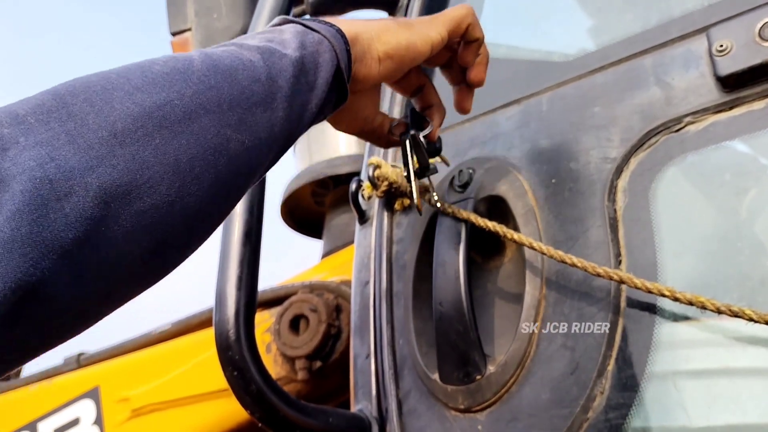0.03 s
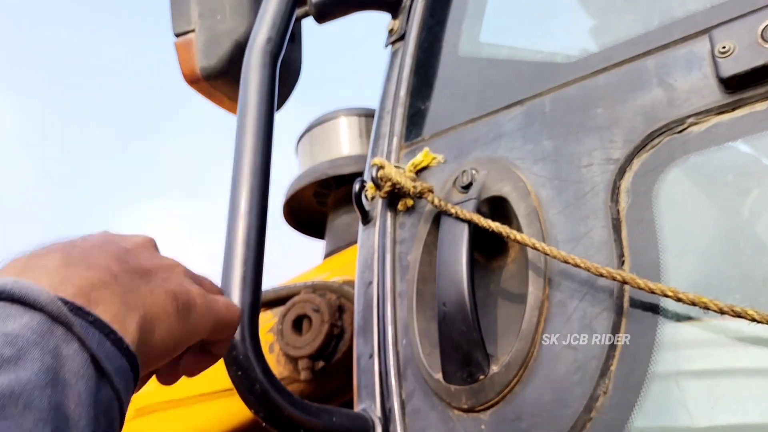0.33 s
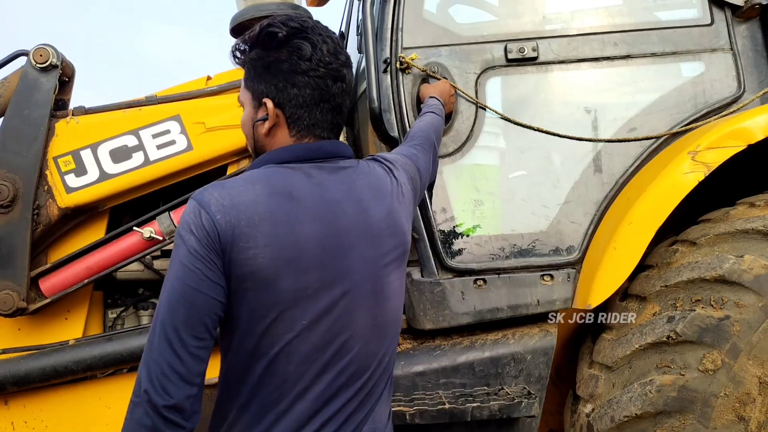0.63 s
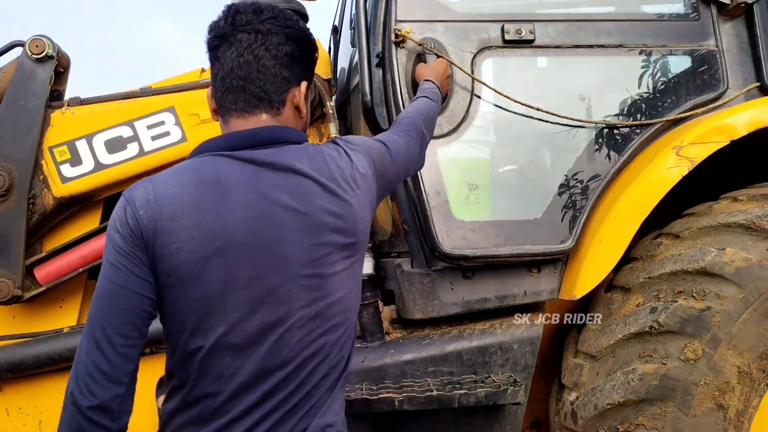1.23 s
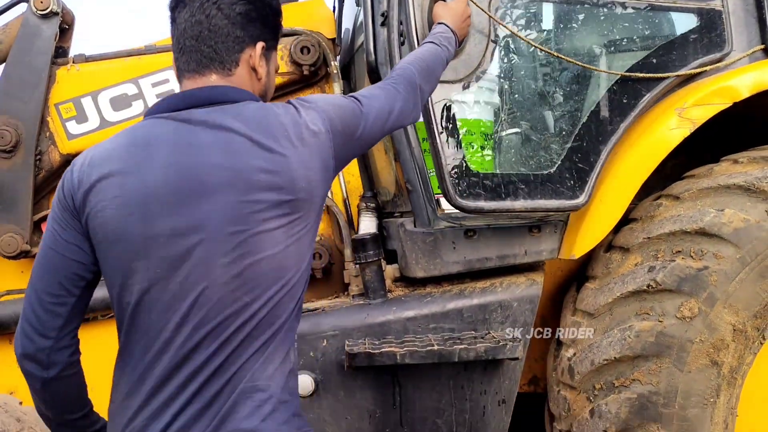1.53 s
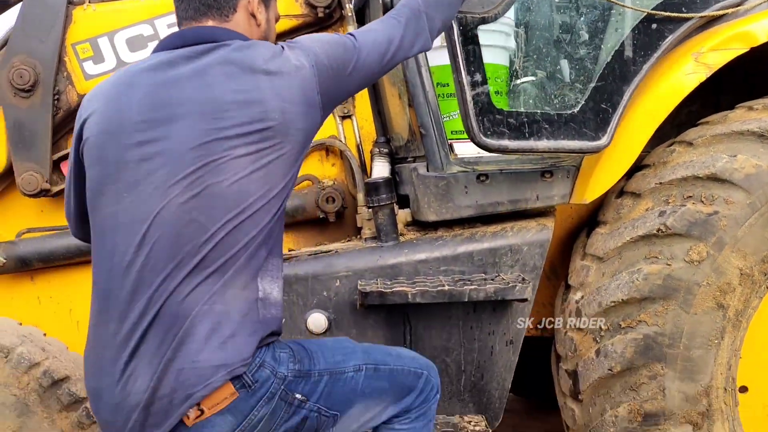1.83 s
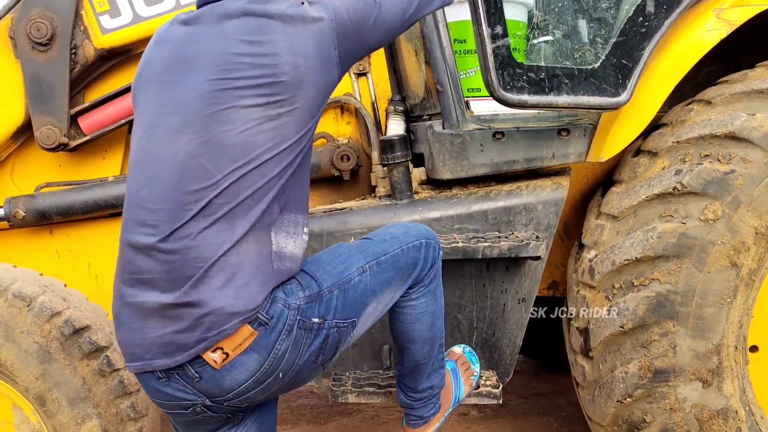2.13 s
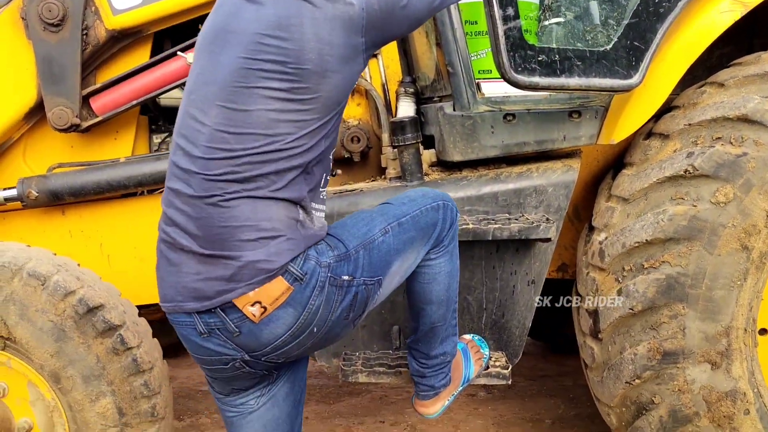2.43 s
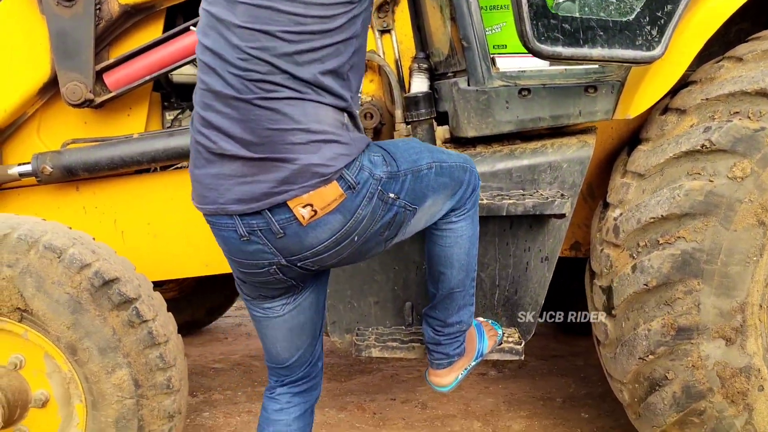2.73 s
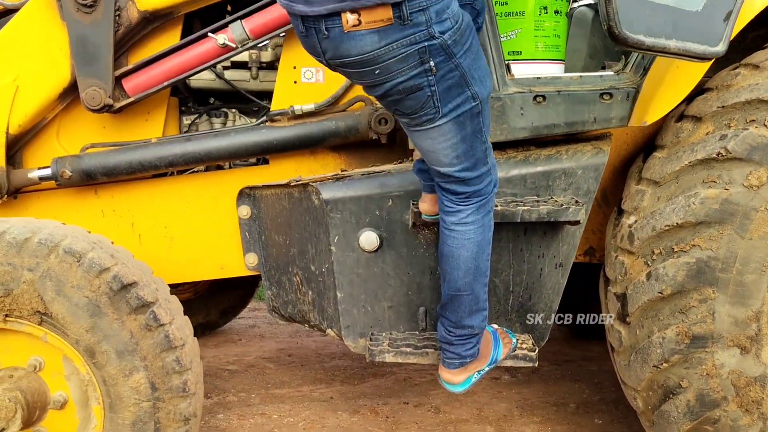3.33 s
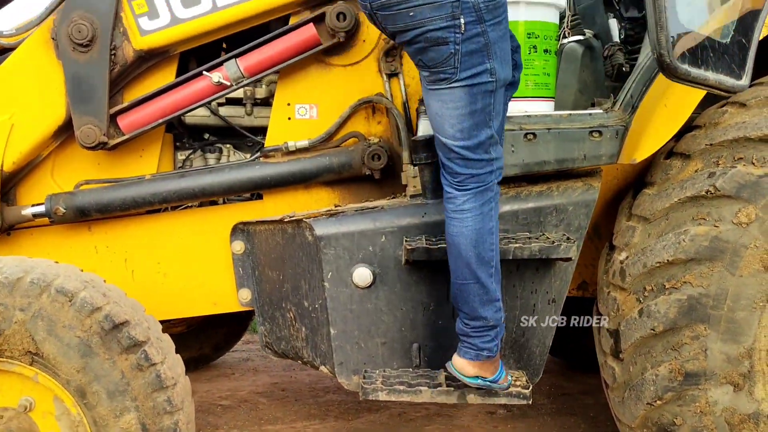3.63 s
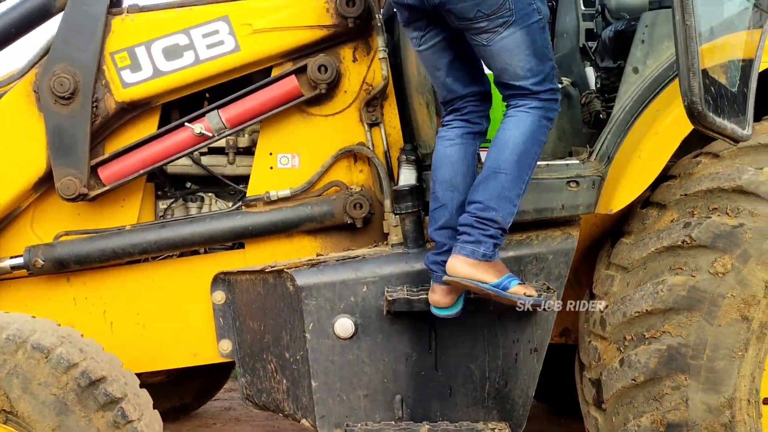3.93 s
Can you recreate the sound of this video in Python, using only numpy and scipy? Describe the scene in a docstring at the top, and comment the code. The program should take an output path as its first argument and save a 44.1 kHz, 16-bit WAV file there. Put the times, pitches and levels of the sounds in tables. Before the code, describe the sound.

A digger's cab door creaks open, close and slightly left. Keys scrape and clink lightly in the first second, and the latch clunks at about 1.1 seconds. From 1.3 the hinge gives a falling creak that slows to ticks by 2.2. A second creak rises from 2.7 into a held tone until the door knocks at 3.9. Small birds chirp faintly in the outdoor air, with soft low bumps nearby.

```python
"""Opening a digger's cab door

Close to a parked digger, its door a little left of the microphones. Keys scrape and jingle, the latch
clunks and the door swings on a dry hinge that sticks and slips: a falling creak that slows to ticks,
then a second that locks into a clean tone until the door knocks. Small birds chirp, one near and a
flock farther off, over faint outdoor air; soft low bumps come from close by."""
import sys
import numpy as np
from scipy import signal
from scipy.fft import rfft, irfft, next_fast_len
from scipy.io import wavfile
from scipy.ndimage import uniform_filter1d

SR = 44100
rng = np.random.default_rng(int(sys.argv[2]) if len(sys.argv) > 2 else 0)


def materialize(psi):
    """Save the field psi as 16-bit PCM at rate SR to the path in sys.argv[1].

    A 1-D psi becomes a single channel; in a 2-D psi each row is a channel.
    """
    bounded = np.clip(np.atleast_2d(psi).T, -1, 1)
    quanta = np.round(bounded * 32767).astype(np.int16)
    wavfile.write(sys.argv[1], SR, quanta)


N = 176400


def amp(db):
    return 10 ** (np.asarray(db) / 20)


def unit_rms(x):
    return x / np.sqrt(np.mean(x ** 2) + 1e-20)


def along(points, hz):
    """Read a curve of (freq_hz, value) points on a log frequency axis."""
    freqs, values = np.transpose(points)
    return np.interp(np.log(hz + 1), np.log(freqs + 1), values)


def add(track, start_s, x):
    """Mix x into the track at start_s."""
    i = max(round(start_s * SR), 0)
    n = min(x.shape[-1], track.shape[-1] - i)
    track[..., i:i + n] += x[..., :n]


def filtered(x, response):
    """Filter x by a complex function of frequency."""
    n = x.shape[-1]
    padded = 2 * next_fast_len(n // 2 + 4096)
    return irfft(rfft(x, padded) * response(np.fft.rfftfreq(padded, 1 / SR)), padded)[..., :n]


def causal_log(log_gain):
    """Complex log spectrum of the minimum-phase filter with this log gain."""
    cepstrum = irfft(log_gain)
    half = cepstrum.shape[-1] // 2
    cepstrum[..., 1:half] *= 2
    cepstrum[..., half + 1:] = 0
    return rfft(cepstrum)


def coloured(x, points):
    """Causal filter of unit power through (freq_hz, gain_db) points."""
    return filtered(x, lambda hz: np.exp(causal_log(np.log(unit_rms(amp(along(points, hz)))))))


def stereo_noise(size):
    """White noise at the two microphones, most alike in the low mids."""
    # likeness of left and right: freq_hz, correlation
    likeness = [(60, 0.083), (200, 1), (1000, 0.7), (5000, 0.083)]

    def mid_side_gains(hz):
        angle = np.arccos(np.clip(along(likeness, hz), -1, 1)) / 2
        return np.array([np.cos(angle), np.sin(angle)])
    mid, side = filtered(rng.standard_normal((2, size)), mid_side_gains)
    return np.array([mid + side, mid - side])


def swells(rows, colour, grain_db):
    """Short swells of coloured noise with a grainy level."""
    level = np.zeros(N)
    for start_s, level_db, length_s in rows:
        add(level, start_s, amp(level_db) * np.sqrt(np.hanning(int(length_s * SR))))
    grain = amp(grain_db * unit_rms(uniform_filter1d(rng.standard_normal(N), size=90)))
    return level * unit_rms(coloured(stereo_noise(N) * grain, colour))


def outdoor_air(level_db=-58):
    """A faint, steady rumble and hiss all around."""
    # outdoor noise floor: freq_hz, gain_db
    colour = [(25, -21.5), (100, 2.5), (800, -22), (2200, -15.5), (4300, -22), (7400, -6.5), (10600, -33)]
    return amp(level_db) * unit_rms(coloured(stereo_noise(N), colour))


def scrapes():
    """Close by, the key scrapes in the lock and a sleeve rustles."""
    # rubbing strokes: start_s, level_db, length_s
    strokes = [(0, -46.5, .1), (.78, -52.5, .14), (1.05, -45, 0.26), (2.28, -59, 0.18)]
    # friction spectrum: freq_hz, gain_db
    colour = [(150, 17.5), (1700, 8), (3200, 7.5), (9000, -2), (14000, -24)]
    return swells(strokes, colour, grain_db=4.5)


def knocks():
    """Latch and door blows and single hinge ticks: short rattling contacts that ring the door."""
    # blows on the door: start_s, level_db, lowpass_hz, fade_s (time to fall 20 dB)
    blows = [(0.065, -33, 2160, 0.013), (1.124, -34, 880, 0.12), (1.138, -33, 8700, 0.0043),
             (1.1408, -11, 4170, 0.0064), (1.149, -32.5, 3800, 0.17), (1.238, -32, 750, 0.09),
             (1.572, -29, 1060, 0.037), (2.139, -23, 5297, 0.0059), (2.272, -26, 5050, 0.0031),
             (2.708, -27.5, 3950, 0.0082), (3.494, -29, 990, 0.087), (3.902, -15, 7800, 0.0084),
             (3.907, -12, 1680, 0.0066)]
    # contact spectrum: freq_hz, gain_db
    colour = [(50, -54), (220, -7), (1400, 2), (3900, 0), (5000, -4), (15000, -9)]
    drive, t = np.zeros(N), np.arange(SR // 4) / SR
    for start_s, level_db, lowpass_hz, fade_s in blows:
        burst = coloured(rng.standard_normal(len(t)), colour)
        burst = unit_rms(signal.lfilter(*signal.butter(2, lowpass_hz, fs=SR), burst))
        add(drive, start_s, burst * amp(level_db - 20 * t / fade_s))
    return panel(door(drive, direct_db=-4.5, flatten=0.29))


def door(drive, direct_db, flatten):
    """The door answers with a sharp front and a dense short ring; flatten (0-1) evens its spectrum."""
    # decay of the door's ring: freq_hz, t60_s
    decay = [(500, 0.14), (10000, 0.17)]
    n = SR // 4
    hz, frame_s, spectra = signal.stft(stereo_noise(n), SR, nperseg=256)
    fade = amp(-60 * frame_s / along(decay, hz)[:, None])
    ring = signal.istft(spectra * fade, SR, nperseg=256)[1][:, :n]
    ring /= np.linalg.norm(ring[0])
    ring[:, 0] += amp(direct_db)
    spectrum = rfft(ring, SR)
    power = np.mean(np.abs(spectrum) ** 2, axis=0)
    ring = irfft(spectrum * np.exp(-flatten * causal_log(np.log(power + 1e-9) / 2)))[:, :n]
    return signal.fftconvolve(drive[None], ring / np.linalg.norm(ring[0]), axes=1)[:, :N]


def panel(x, mode_db=2, bass_t60_s=0.14, knee_hz=2520):
    """The steel and glass panel adds its own modes, narrow in the bass and broad in the treble."""
    # panel resonances: freq_hz
    mode_hz = [156, 245, 600, 1040, 1290, 1470, 2350, 3500, 4000]
    t, hz = np.arange(SR // 4) / SR, np.array(mode_hz)[:, None]
    t60_s = bass_t60_s / (1 + hz / knee_hz)
    unity_peak = 2 * np.log(1000) / (t60_s * SR)
    modes = unity_peak * np.cos(2 * np.pi * hz * t) * amp(mode_db - 60 * t / t60_s)
    return x + signal.fftconvolve(x, modes.sum(axis=0)[None], axes=1)[:, :N]


def keys(squeak_s=0.052, squeak_db=-49, crack_t60_s=0.055):
    """Keys squeak in the lock, then tick and clink: a dry crack and one short mode for each strike."""
    # keys striking each other or the lock: start_s, level_db, ring_hz, t60_s
    clinks = [(.409, -49, 2350, .025), (.433, -50, 2400, .025), (.667, -38, 8005, .085),
              (.701, -45, 5600, .02), (.731, -41.5, 9520, .06)]
    # squeaks in the lock: start_s, from_hz, to_hz
    squeaks = [(0.186, 1800, 2165), (0.234, 1750, 1703)]
    out, t = np.zeros((2, N)), np.arange(SR // 4) / SR
    for start_s, level_db, ring_hz, t60_s in clinks:
        ring = 0.5 * amp(-60 * t / t60_s) * np.sin(2 * np.pi * ring_hz * t)
        low_hz, high_hz = max(ring_hz / 3, 1900), 1.25 * ring_hz
        crack = unit_rms(filtered(stereo_noise(len(t)), lambda hz: (hz > low_hz) & (hz < high_hz)))
        add(out, start_s, amp(level_db) * (ring + crack * amp(-60 * t / crack_t60_s)))
    n = int(squeak_s * SR)
    envelope = amp(squeak_db) * np.sqrt(2 * np.hanning(n))
    for start_s, from_hz, to_hz in squeaks:
        jitter = 1 + 0.25 * rng.standard_normal(len(t))[:n]
        pitch_hz = np.linspace(from_hz, to_hz, n) * jitter
        add(out, start_s, envelope * np.sin(2 * np.pi * np.cumsum(pitch_hz) / SR))
    return out


def bumps():
    """Soft low bumps close to the microphones."""
    # bumps: start_s, level_db, length_s
    thuds = [(.435, -35, 0.071), (.545, -39, 0.087), (2.15, -41, 0.43), (2.475, -32, 0.027),
             (2.51, -43, 0.25), (2.7, -49, 0.72), (3.39, -47.5, 0.09)]
    # their bass-heavy spectrum: freq_hz, gain_db
    colour = [(25, -39), (80, 1.5), (150, -4), (330, -27), (3000, -124)]
    return swells(thuds, colour, grain_db=7.0)


def birds(note_s=0.02, fall_hz=1210, loudest_hz=7620, hz_per_db=75, flock_per_s=16, echo_t60_s=0.11):
    """Quick falling notes with a short echo: a flock far off and a near bird, lower when softer."""
    # the near bird's notes: start_s, level_db
    chirps = [(1.019, -42.5), (1.053, -40.5), (1.085, -39), (2.495, -40.5), (2.526, -40.5), (2.558, -39)]
    out, n = np.zeros(N), int(note_s * SR)
    draws = rng.random((200, 3))[:int(flock_per_s * N / SR)]
    flock = [(when * N / SR, 6400 + 1000 * high, -59 + 8 * loud) for when, high, loud in draws]
    loudest_db = max(db for _, db in chirps)
    near = [(start_s, loudest_hz + hz_per_db * (db - loudest_db), db) for start_s, db in chirps]
    for start_s, start_hz, level_db in near + flock:
        pitch_hz = start_hz - fall_hz * np.linspace(0, 1, n)
        add(out, start_s, amp(level_db) * np.hanning(n) * np.sin(2 * np.pi * np.cumsum(pitch_hz) / SR))
    t = np.arange(SR // 2) / SR
    echo = rng.standard_normal((2, len(t))) * amp(-60 * t / echo_t60_s)
    echo /= np.linalg.norm(echo[0])
    return out + amp(-3.5) * signal.fftconvolve(out[None], echo, axes=1)[:, :N]


def pulses(times_s, sizes):
    """Sharp pulses placed between samples with a windowed sinc."""
    centres = times_s[:, None] * SR
    taps = np.floor(centres).astype(int) + np.arange(-7, 9)
    shape = np.sinc(taps - centres) * np.cos(np.pi * (taps - centres) / 16) ** 2
    return np.bincount(np.clip(taps, 0, N).ravel(), (sizes[:, None] * shape).ravel(), N + 1)[:N]


def stick_slip(path, locks, lock_roughness=0.16, grit_per_s=800, swing_rad_per_s=3.017):
    """One pulse per slip; roughness scatters the slips and adds grit. Smooth slips can lock into a tone."""
    # the door's voice under rough slipping: freq_hz, gain_db
    creak_colour = [(70, -16), (155, 0.5), (320, -8), (600, -1), (1300, 3), (2400, -3), (4000, -2),
                    (5300, -11.5), (9000, -20), (11000, -39)]
    # its voice under the locked tone: freq_hz, gain_db
    tone_colour = [(120, -21.5), (410, -3), (820, -3.5), (1230, 6), (1640, 1), (2700, -2), (3650, 4),
                   (4500, -10), (4950, -6.5), (5700, -20), (7700, -18), (11000, -38.5)]
    time_s, rate_hz, level_db, roughness = np.transpose(path)
    t = np.arange(N) / SR
    moving = (t >= time_s[0]) & (t <= time_s[-1])
    rate = np.interp(t, time_s, rate_hz)
    level = moving * amp(np.interp(t, time_s, level_db))
    rough = np.interp(t, time_s, roughness)

    cycles = np.cumsum(rate * moving) / SR
    slips = np.arange(1, int(cycles[-1]))
    at = np.searchsorted(cycles, slips)
    timing_draw, size_draw = rng.standard_normal((1000, 2))[:len(slips)].T
    drift = signal.lfilter([1], [1, -0.7], 0.1986 * rough[at] * timing_draw)  # in cycles
    slip_s = np.interp(slips + drift, cycles[moving], t[moving])
    sizes = level[at] * np.sqrt(SR / rate[at]) * amp(1.5 * np.sqrt(rough[at]) * size_draw)
    locked = locks * np.exp(-(rough[at] / lock_roughness) ** 2)

    grit = unit_rms((rng.random(N) < grit_per_s / SR) * rng.standard_normal(N))
    hiss = amp(-15) * rng.standard_normal(N)
    rub = level * rough * (amp(9.5) * np.sqrt(rough) * grit + hiss)
    creak = coloured(pulses(slip_s, sizes * (1 - locked)) + rub, creak_colour)
    tone = door(coloured(pulses(slip_s, sizes * locked), tone_colour), direct_db=0, flatten=0.86)
    angle = swing_rad_per_s * t  # the door's answer changes as it turns
    first, second = (door(creak, direct_db=-6.5, flatten=0.34) for _ in range(2))
    return panel(np.cos(angle) * first + np.sin(angle) * signal.hilbert(second).imag) + tone


def hinge():
    """The dry hinge creaks twice as the door moves."""
    # first creak, slowing to ticks: time_s, slips_per_s, level_db, roughness (0-1)
    swing = [(1.305, 817, -37.5, 0.2), (1.35, 707, -33.5, 0.2), (1.405, 707, -33.5, 0.01),
             (1.435, 494, -32, 0.09), (1.56, 430, -30, 0.08), (1.59, 382, -33, 0.36),
             (1.75, 250, -31, 0.12), (1.825, 226, -32.5, 0.01), (1.85, 155, -32, 0.27),
             (1.92, 145.5, -33, 0.15), (2.03, 76.5, -33.5, 0.24), (2.15, 38, -38, 0.31)]
    # second creak, rising to a held tone: time_s, slips_per_s, level_db, roughness (0-1)
    pull = [(2.71, 50.1, -41.5, 0.53), (2.86, 145.8, -33.5, 0.223), (2.96, 184.3, -33.5, 0.334),
            (3.0, 269.5, -27, 0.053), (3.07, 265.8, -27, 0.046), (3.11, 398.7, -28, 0.18),
            (3.17, 398.2, -29.5, 0.013), (3.27, 411.9, -30.5, 0.006), (3.42, 400.9, -29.5, 0.008),
            (3.488, 401.7, -30, 0.016), (3.53, 377.3, -38.5, 0.72), (3.65, 411, -28.5, 0.097),
            (3.77, 453, -30.5, 0.032), (3.85, 451, -28, .012), (3.91, 396, -37, 0.11),
            (4.0, 135.9, -32.5, 0.59)]
    return stick_slip(swing, locks=False) + stick_slip(pull, locks=True)


def from_left(x, lead_s=0.00016):
    """Sound reaches the left microphone sooner and with more treble."""
    # left level over right: freq_hz, gain_db
    balance = [(2000, -0.5), (4000, 5)]
    side = np.array([[0.5], [-0.5]])
    return filtered(x, lambda hz: amp(side * along(balance, hz)) * np.exp(2j * np.pi * hz * side * lead_s))


def scene():
    """The door is a little to the left, keys and bumps are close; birds and air lie all around."""
    cab = from_left(hinge() + knocks())
    close = keys() + scrapes() + bumps()
    return cab + close + birds() + outdoor_air()


def record(dry):
    """The microphones pass nothing above 15.4 kHz."""
    return filtered(dry, lambda hz: hz < 15400)


dry = scene()
out = record(dry)
materialize(out)
```